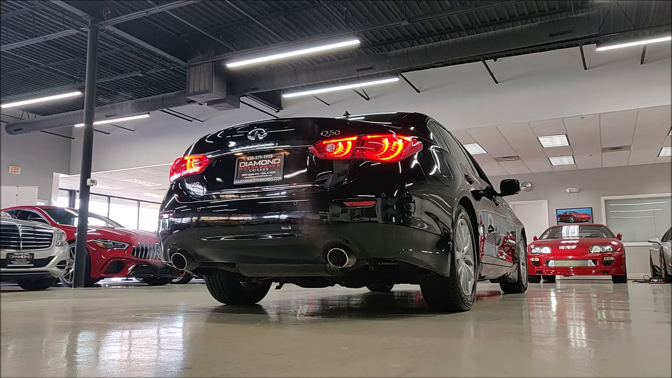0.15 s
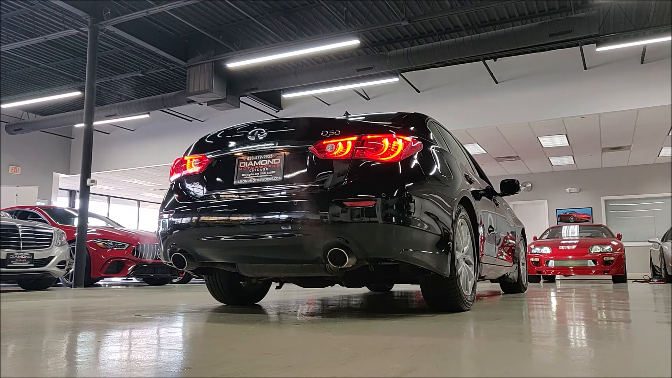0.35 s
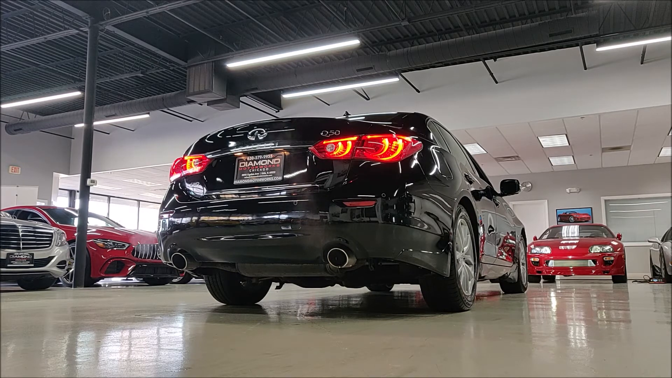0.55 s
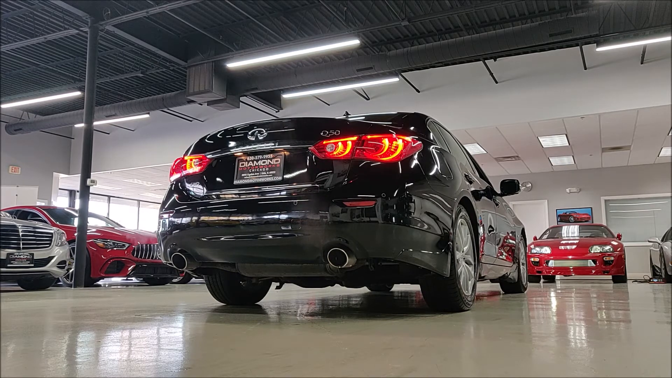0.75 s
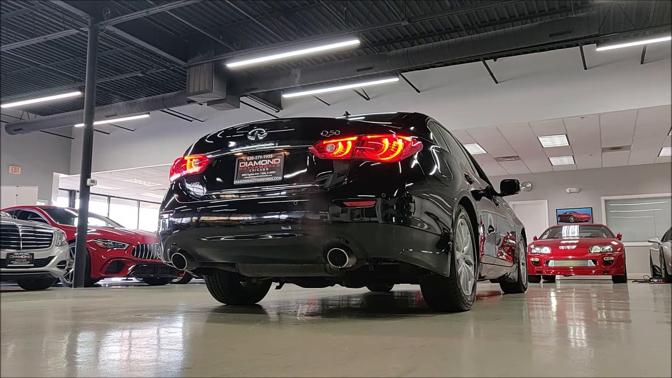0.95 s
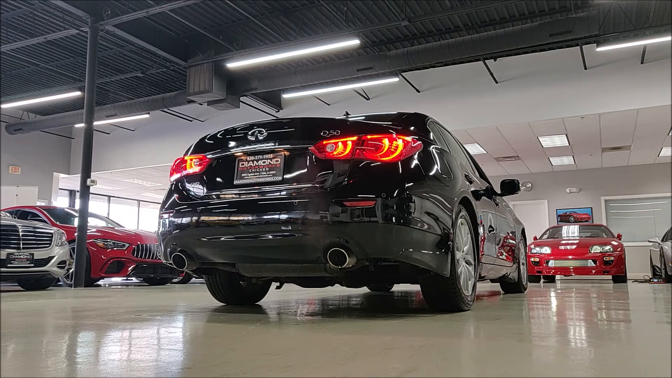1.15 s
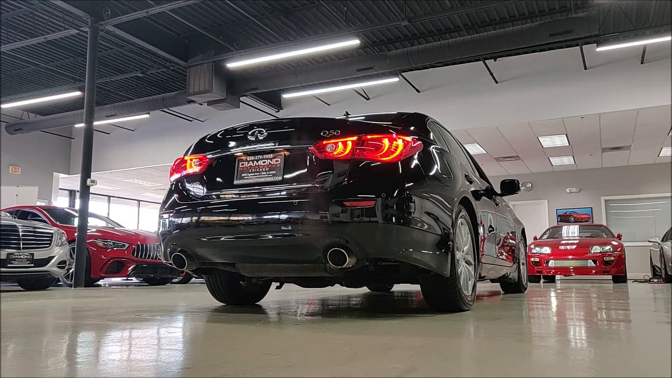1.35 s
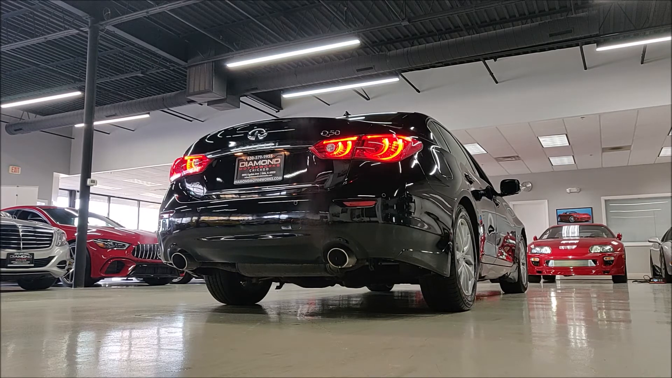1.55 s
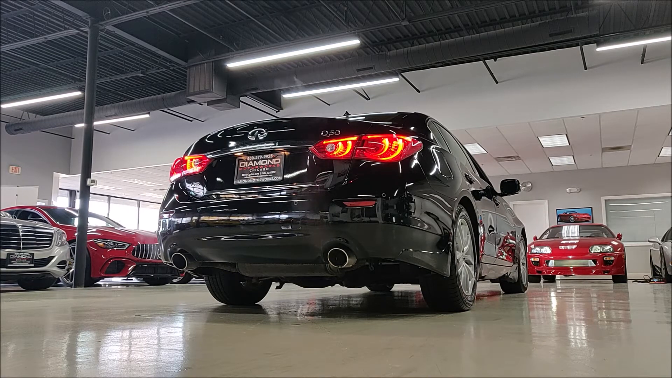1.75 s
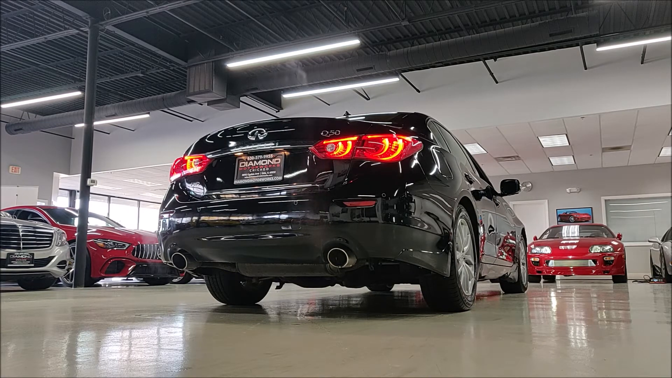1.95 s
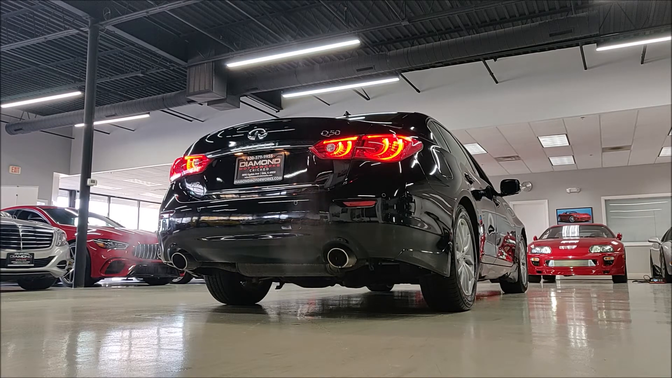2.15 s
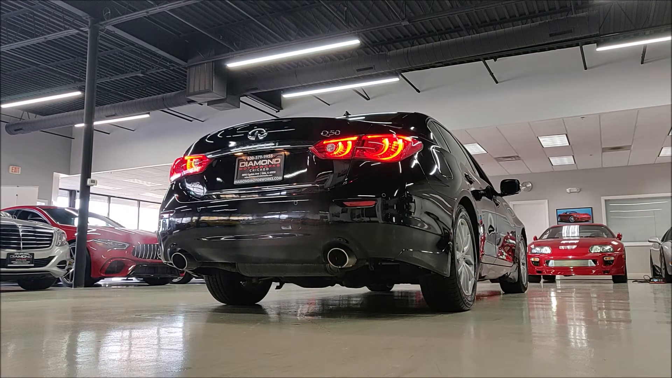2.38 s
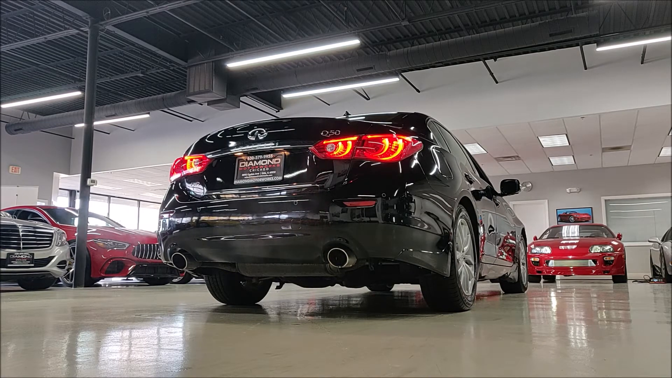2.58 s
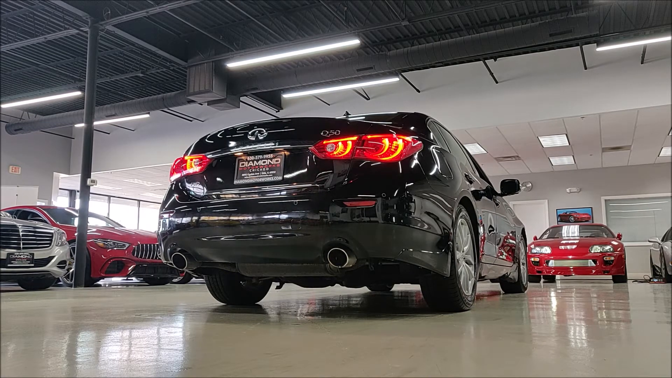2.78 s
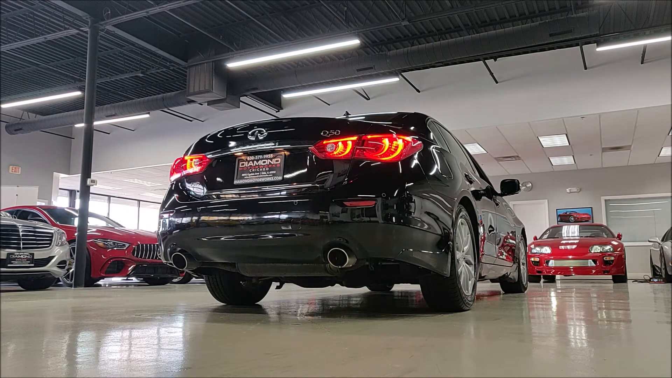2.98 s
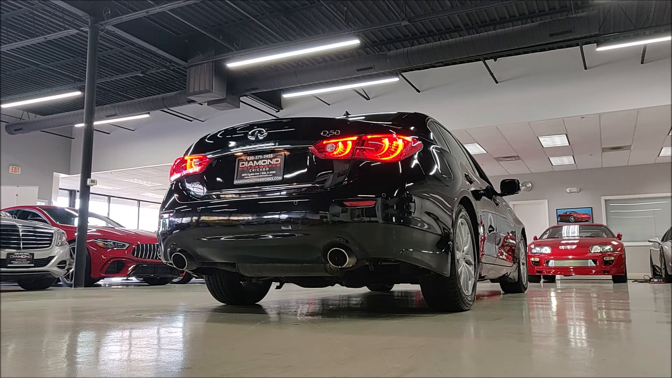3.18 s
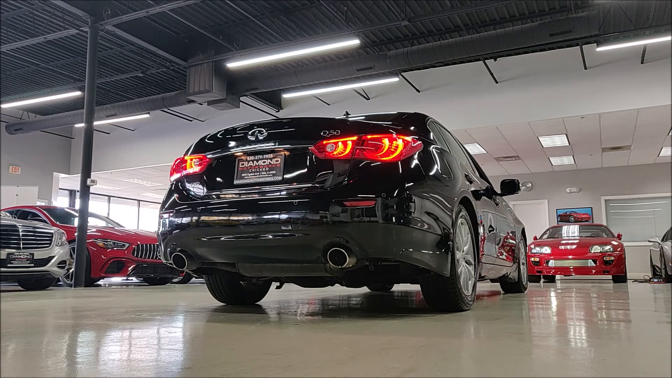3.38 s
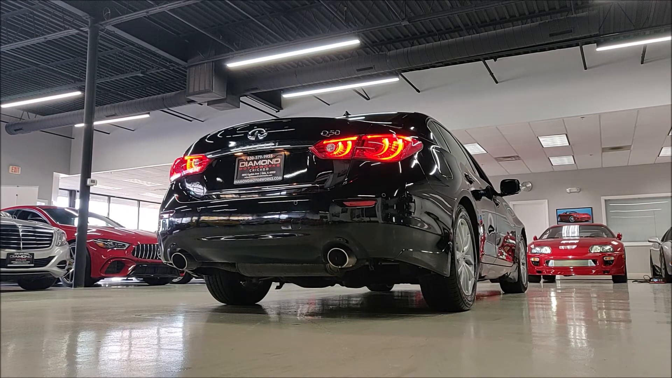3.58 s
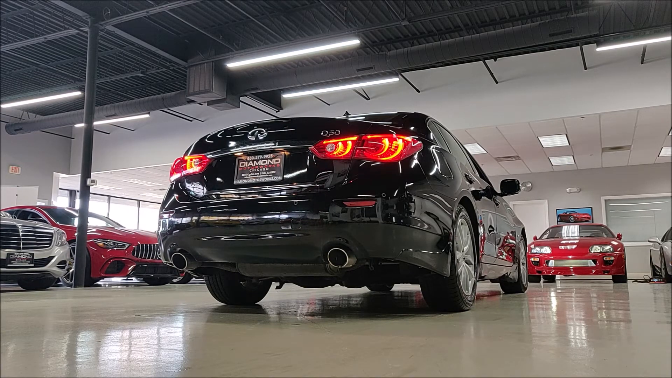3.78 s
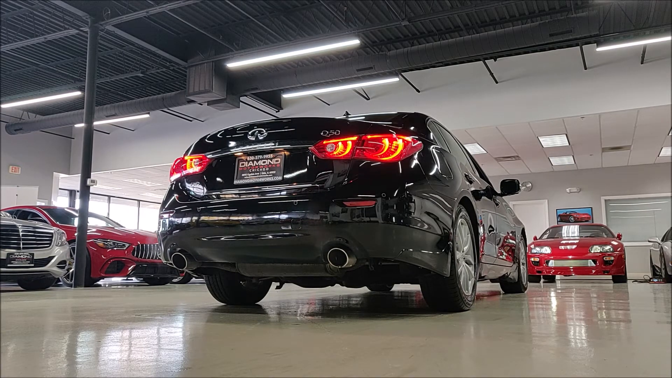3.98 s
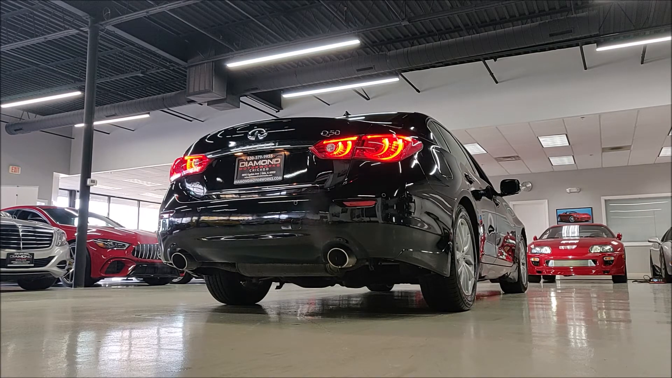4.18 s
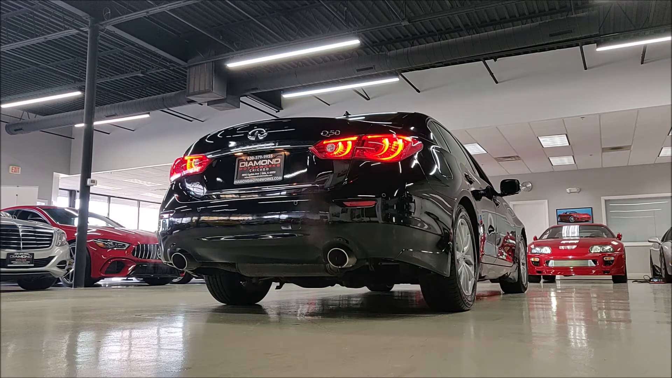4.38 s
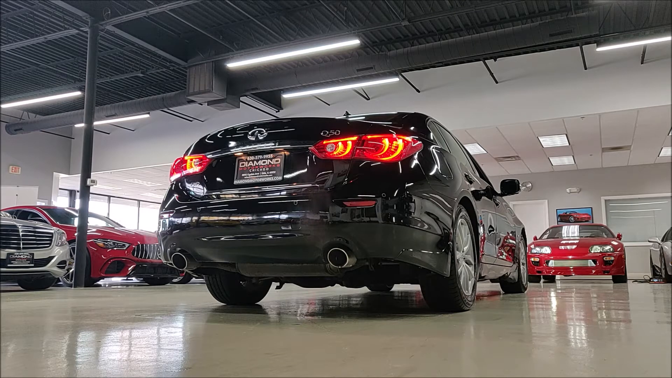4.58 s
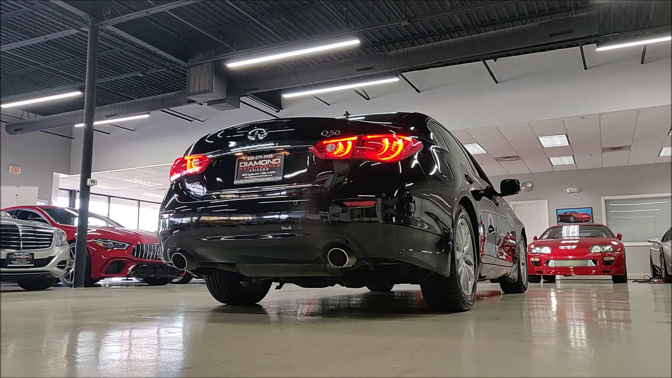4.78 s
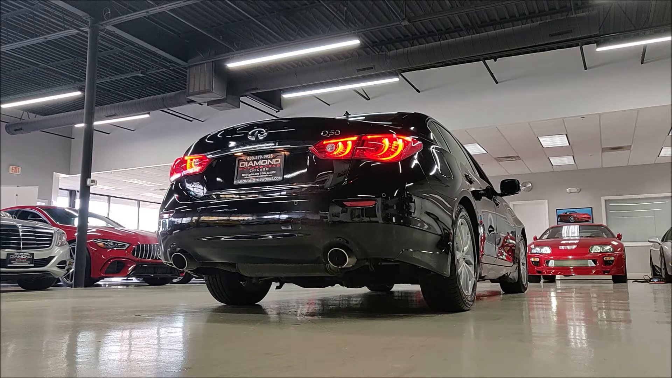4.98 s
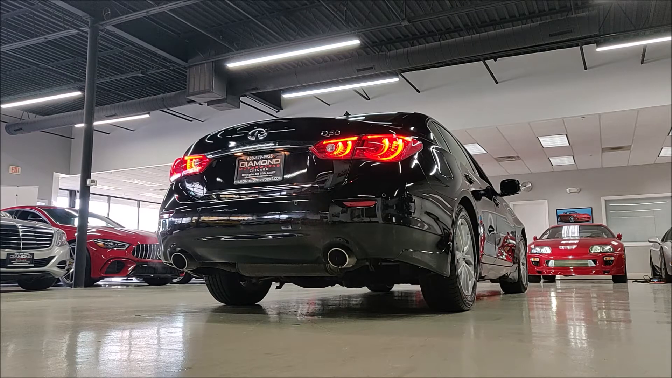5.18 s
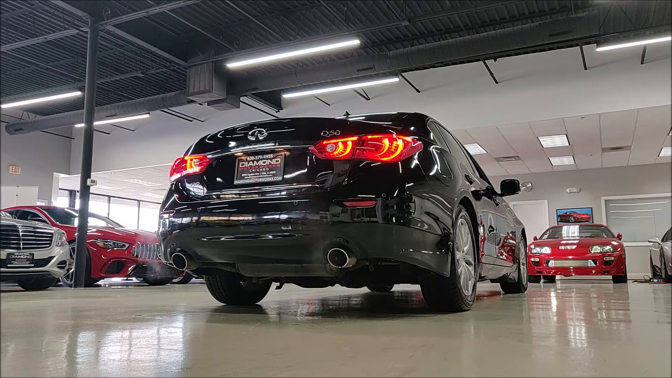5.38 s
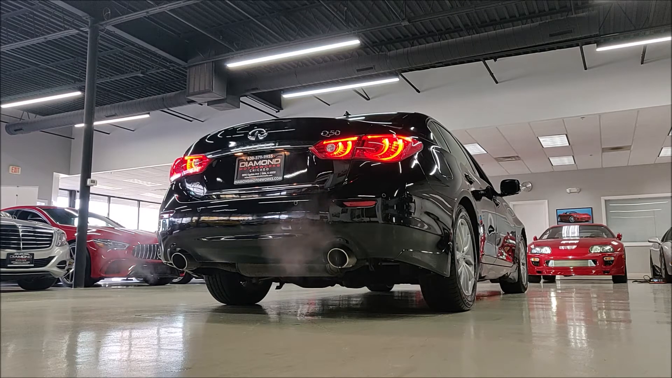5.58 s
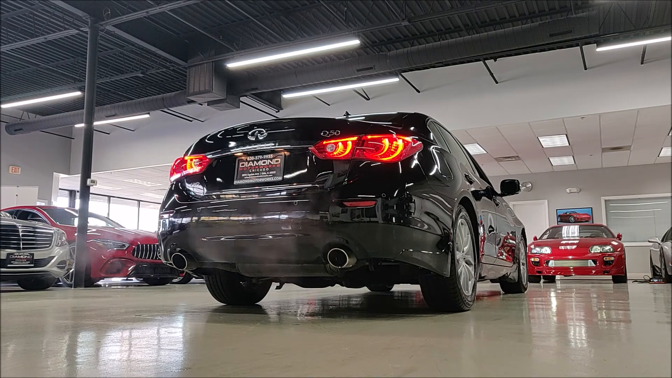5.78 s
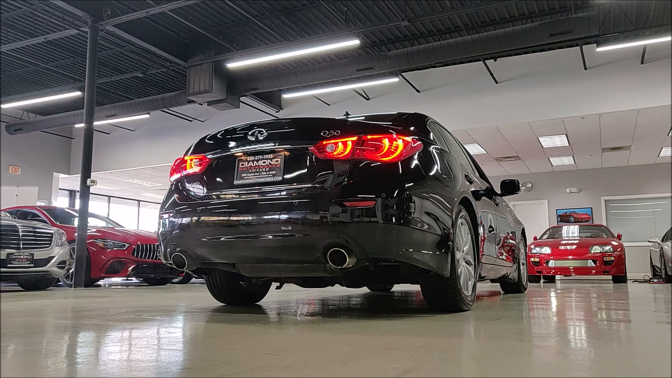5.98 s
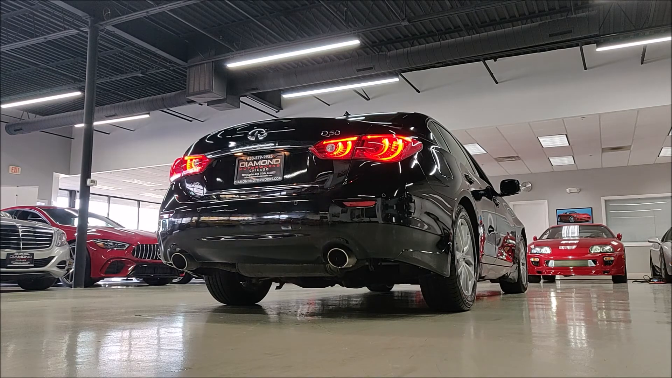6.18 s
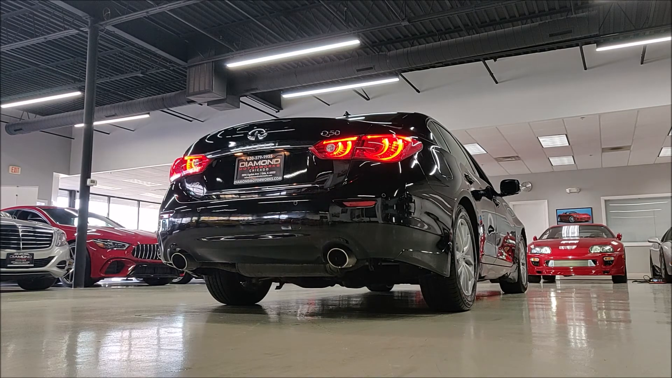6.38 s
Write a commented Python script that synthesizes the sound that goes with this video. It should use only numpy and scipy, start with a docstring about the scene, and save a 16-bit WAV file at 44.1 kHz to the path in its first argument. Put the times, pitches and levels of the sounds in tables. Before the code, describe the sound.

A car's exhaust purrs quietly at idle over steady low room noise in a large reflective hall. The throttle is stabbed: a full, hollow roar with airy hiss rises, then sinks through scattered pops to a slow idle. A stronger stab follows, climbing fast to a metallic howl, with a burst of sharp pops afterwards. Stereo microphones sit low behind the tailpipes; treble spreads wide in the echoes.

```python
"""A car idles on six cylinders in a large hard-floored hall, heard from low behind its tailpipes, then is revved twice.
Firing orders sound as clean tones; gas puffed out at each firing rings the fixed modes of pipes and silencer.
The jet hisses at the tips, belt-driven parts whine, the open intake whistles and late burns pop.
Dense echoes of the hall make the treble differ between the two microphones."""
import sys
import numpy as np
from scipy import signal
from scipy.fft import rfft, irfft, next_fast_len
from scipy.io import wavfile
from scipy.ndimage import uniform_filter1d

SR = 44100
rng = np.random.default_rng(int(sys.argv[2]) if len(sys.argv) > 2 else 0)


def store_pcm(level_fs):
    """Save levels as 16-bit WAV."""
    pcm = np.round(np.clip(level_fs, -1, 1) * 32767).astype(np.int16)
    wavfile.write(sys.argv[1], SR, np.atleast_2d(pcm).T)


N = 283989  # samples heard
LONG = N + 4096  # the engine runs on past the end
SIZE = next_fast_len(N + 2 * SR)
HZ = np.fft.rfftfreq(SIZE, 1 / SR)
TIME = np.arange(LONG) / SR  # s


def gain_of(db):
    """Level: 20 dB is a tenfold amplitude."""
    return 10 ** (np.asarray(db) / 20)


def evened(x):
    """Normalization: scales a signal to an rms of 1."""
    return x / np.sqrt(np.mean(x ** 2) + 1e-20)


def read(points, hz=HZ):
    """Spectral envelope: interpolates a table along log frequency."""
    f, value = np.transpose(points)
    return np.interp(np.log(hz + 1), np.log(f + 1), value)


def follow(curve, late_s=0):
    """Control curve: interpolates a table in time, optionally delayed."""
    s, value = np.transpose(curve)
    return np.interp(TIME - late_s, s, value)


def shape(x, response):
    """Linear filtering: multiplies the spectrum by a frequency response."""
    return irfft(rfft(x, SIZE) * response, SIZE)[..., :LONG]


def modes(table):
    """Modal superposition: sums damped resonances, with a steep skirt above the last one."""
    rings = 0
    for k, (f, width, db) in enumerate(table):
        resonance = 1j * HZ * width / (f * f - HZ ** 2 + 1j * HZ * width)
        # opposite signs of neighbours keep the valleys from cancelling
        rings = rings + (-1) ** k * gain_of(db) * resonance
    return rings / (1 + 1j * HZ / (1.41 * table[-1][0])) ** 2


def packed(response):
    """Porous absorption: the silencer packing soaks up the treble."""
    return response / (1 + 1j * HZ / 3000) ** 2


def lumps(seconds):
    """Random modulation: twice-smoothed noise of spread 1."""
    width = round(seconds * SR)
    return evened(uniform_filter1d(uniform_filter1d(rng.standard_normal(LONG), width), width))


def arch(s0, s1):
    """Amplitude envelope: swells and fades between two times."""
    return np.sin(np.pi * np.clip((TIME - s0) / (s1 - s0), 0, 1)) ** .5


def thin_tone(turns, s0, s1, db, unsteady):
    """Phase diffusion: a brief tone breaks up in level while its phase wanders at random."""
    wander = unsteady * np.cumsum(rng.standard_normal((2, LONG)), axis=1)
    return np.sqrt(2) * gain_of(db + 2.5 * lumps(.03)) * arch(s0, s1) * np.cos(2 * np.pi * turns + wander)


# colour of the steady noise of hall and engine bay: f/Hz, relative spectral level/dB
HALL_COLOUR = [(18, -46.5), (30, -23), (135, 6), (239, -14.5), (334, -11), (445, -11.5), (621, -13),
               (700, -14), (1160, -28), (3460, -26.5), (4610, -42.5), (6290, -63.5), (9000, -65),
               (11700, -83), (19800, -120)]


def hall_noise():
    """Stationary noise: white noise filtered to the colour of hall and engine bay."""
    noise = shape(rng.standard_normal((2, LONG)), gain_of(read(HALL_COLOUR)))
    return gain_of(-44.5) * evened(noise)


# firing rate of the engine: t/s, f/Hz
FIRING_RATE = [(0.0, 41.28), (0.14, 38.85), (0.9, 37.78), (1.85, 36.35), (1.91, 39.98), (2.15, 71.92),
               (2.3, 86), (2.37, 91.34), (2.45, 93.13), (2.55, 92.9), (2.63, 90.94), (2.75, 85.14),
               (3.0, 68.18), (3.25, 59.1), (3.55, 52.9), (4.0, 51.07), (4.22, 49.36), (4.4, 43.9),
               (4.73, 35.15), (5.25, 38.54), (5.36, 50.63), (5.45, 61), (5.59, 97.73), (5.73, 136.6),
               (5.79, 146.8), (5.87, 146.4), (5.95, 143.2), (6.03, 139.2), (6.2, 125.1), (6.44, 113.7)]


def firing_turns():
    """Phase as integrated frequency: counts the firings so far."""
    return np.cumsum(follow(FIRING_RATE)) / SR


def level_db(push, idle_db, octave_db, push_db, late_s=0):
    """Level law: rises or falls with octaves of speed and with a second control, which may act late."""
    octaves = np.log2(follow(FIRING_RATE) / 37)  # above a 37 Hz idle
    return idle_db + octave_db * octaves + push_db * follow(push, late_s)


# load on the engine: t/s, load (1 = full, below 0 = engine braking)
LOAD = [(0.0, 0.3), (0.4, -0.04), (1.88, 0.02), (1.96, 0.68), (2.02, 1.05), (2.15, 0.97), (2.26, 0.73),
        (2.42, 0.16), (2.7, 0.14), (2.95, 0.06), (3.4, -0.08), (4.15, -0.12), (4.29, 0.38), (4.5, 0.11),
        (5.25, 0.05), (5.33, 0.62), (5.45, 0.9), (5.58, 0.74), (5.7, 0.67), (5.82, 0.42), (5.95, -0.1),
        (6.12, 0.05), (6.3, 0.4), (6.44, 0.55)]
# firing tones: multiple of the firing rate, idle level/dB, change per octave of speed/dB, gain at full load/dB
FIRING_ORDERS = [(1.0, -48.5, 2.5, 20.5), (2.0, -54.5, 6, 18), (3.0, -52.5, 7.5, 13), (4.0, -53, -15, 26.5)]
# what pipes and hall do to a tone of each pitch: f/Hz, gain/dB
TONE_GAIN = [(36, -6.5), (45, -1.5), (56, 4.5), (66, -0.5), (74, -9), (82, -0.5), (91, 9.5), (100, 5),
             (112, 4), (125, 4.5), (140, -2), (150, 6), (165, 1.5), (180, -1.5), (195, 0), (213, -3),
             (240, -21), (280, -6), (315, -14), (335, 5.5), (352, 9.5), (370, -3.5), (392, -9),
             (420, -11.5), (520, -9.5), (575, 4), (620, -5)]
# modes of the long pipes: f/Hz, width/Hz, level/dB
LONG_PIPES = [(59.8, 1.6, 1.5), (84, 14.6, 2), (138.3, 15, -2), (157.1, 6.58, 9), (213.7, 29, 3.5)]


def firing_tones():
    """Harmonic series: each order of the firing rate is a tone, and passing orders excite the pipe modes."""
    hz, turns = follow(FIRING_RATE), firing_turns()
    # uneven burning makes each tone swell and sink, less so under load
    uneven_db = 2.5 * np.clip(1 - follow(LOAD), .3, 1)
    tones = 0
    for order, *law in FIRING_ORDERS:
        db = level_db(LOAD, *law) + read(TONE_GAIN, order * hz) + uneven_db * lumps(.06)
        lag_turns = .07 * order * order  # higher orders leave the pipes later
        tones = tones + np.sqrt(2) * gain_of(db) * np.cos(2 * np.pi * (order * turns - lag_turns))
    return tones + gain_of(-35) * shape(tones, modes(LONG_PIPES))


def gas_pulses():
    """Pulsed flow: every firing gives a sharp bang and a decaying puff, of a strength drawn at random."""
    turns = firing_turns()
    strength = gain_of(2.84 * rng.standard_normal((1000, 2)))[turns.astype(int)].T
    puffs = 0.5 + strength * np.exp(-(turns % 1) / 0.6)
    firing = np.diff(np.floor(turns), prepend=0)
    bangs = strength * firing * np.sqrt(SR / follow(FIRING_RATE))
    return puffs, bangs


# surge of gas beyond what the speed gives: t/s, surge (1 = full)
SURGE = [(0.0, 0.32), (0.4, 0.24), (1.88, 0.13), (1.97, 0.79), (2.06, 1.22), (2.18, 1.05), (2.32, 0.5),
         (2.5, -0.18), (2.75, 0.32), (2.95, 0.48), (3.2, 0.12), (4.15, 0.094), (4.75, 0.14), (5.27, 0.23),
         (5.4, 0.91), (5.5, 1.35), (5.62, 1.1), (5.72, 0.59), (5.85, 0.35), (6.05, 0.24), (6.14, 0.38),
         (6.25, 0.11), (6.44, 0.16)]
# gas in burble, long pipes, silencer, tailpipes, one row each:
# idle level/dB, change per octave of speed/dB, gain at full surge/dB, delay behind the surge/s
FLOW = [(-57.5, 1, 13.5, .005), (-53.5, 12, 11.5, 0.0063), (-54, 10, 11, 0.08), (-59, 13, 12.5, 0.023)]
# modes of burble, silencer, tailpipes, howl and upper tailpipes (rasp): f/Hz, width/Hz, level/dB
BURBLE = [(24, 14, -8), (43, 8, 0)]
SILENCER = [(273, 40, -1.5), (310.6, 20, 7.5), (352.8, 22.6, 9.5), (397.5, 42, 0.5)]
TAILPIPES = [(523, 133, -3), (565, 15, 7), (611.8, 9.3, 7.5), (819, 190, -7), (896, 76, -1.5),
             (910, 240, -20.5)]
HOWL = [(646, 16, 0), (680, 35, -6)]
RASP = [(786, 12, -4), (876, 14, 0), (1098, 22, -8), (1237, 16, 0), (1258, 16, 0), (1403, 12, -3),
        (1630, 40, -14), (1840, 90, -21)]
# control of the howl, then of the rasp: t/s, level/dB
HOWL_LEVEL = [(0.0, -54.5), (1.86, -56), (2.06, -32), (2.13, -31), (2.19, -24.5), (2.23, -39),
              (2.33, -40.5), (2.42, -46), (2.52, -44), (2.94, -42.5), (2.96, -28), (2.985, -32), (3.0, -50),
              (3.3, -57), (4.3, -53), (5.27, -60), (5.36, -43), (5.43, -35), (5.49, -20.5), (5.51, -39),
              (5.522, -14), (5.56, -16), (5.575, -12), (5.622, -8), (5.636, -19), (5.646, -12),
              (5.662, -19), (5.68, -7.5), (5.693, -20), (5.703, -5.5), (5.717, -21.5), (5.73, -15.5),
              (5.745, -31), (5.8, -21.5), (5.95, -34), (6.2, -40.5), (6.44, -29.5)]
RASP_LEVEL = [(0.0, -69), (1.9, -63), (2.06, -39), (2.12, -40.5), (2.25, -46.5), (2.4, -60.5), (2.92, -57),
              (2.96, -53), (3.02, -68), (5.3, -67), (5.45, -40.5), (5.55, -35), (5.62, -30.5),
              (5.68, -28.5), (5.75, -34), (5.8, -44), (6.44, -53)]


def gas_in_pipes(puffs, bangs):
    """Forced resonance: turbulent puffs and sharp bangs ring the fixed modes of pipes and silencer."""
    burble_db, long_db, silencer_db, tail_db = [level_db(SURGE, *law) for law in FLOW]
    for s0, s1, lumpy_db, *_ in OVERRUN:
        burble_db = burble_db + lumpy_db * arch(s0, s1)
    # level/dB, sharp bang against soft puff, modes
    pipes = [(burble_db, 0, BURBLE), (long_db, .8, LONG_PIPES), (silencer_db, .9, SILENCER),
             (tail_db, .8, TAILPIPES), (follow(HOWL_LEVEL) - 13.5, .5, HOWL),
             (follow(RASP_LEVEL), .4, RASP)]
    under_load = 1 + .7 * np.clip(follow(LOAD), 0, 1)  # full cylinders bang harder
    gas = 0
    for db, crisp, table in pipes:
        drive = puffs * rng.standard_normal((2, LONG)) + crisp * bangs * under_load
        response = packed(modes(table))
        gas = gas + shape(drive * gain_of(db), response) / shape(drive[0], response).std()
    return gas


def singing(hz, db):
    """Self-sustained oscillation: flow keeps a pipe mode sounding, wavering in pitch and strength."""
    wander = .025 * uniform_filter1d(np.cumsum(rng.standard_normal((2, LONG)), axis=1), 60)
    return np.sqrt(2) * gain_of(db + 1.5 * lumps(.012)) * np.cos(2 * np.pi * hz * TIME + wander)


# control of the lower tailpipe mode as it sings: t/s, level/dB
RING_LEVEL = [(0.0, -63), (0.66, -84), (1.92, -58), (2.08, -50), (2.37, -22.5), (2.44, -35), (2.49, -51),
              (2.64, -37.5), (2.92, -54), (2.96, -36), (3.05, -69), (3.08, -43), (3.16, -63), (5.27, -66.5),
              (5.54, -43.5), (5.67, -38.5), (5.78, -16.5), (5.92, -43), (5.95, -21.5), (6.28, -41.5),
              (6.4, -28.5), (6.44, -41)]


def singing_pipes():
    """Modal tones: the lowest howl mode and the lower tailpipe mode sing at fixed pitch."""
    howl = singing(639, follow(HOWL_LEVEL) - 2.5)
    return howl + singing(568, follow(RING_LEVEL) - 5)


# colour of the hiss at the tips: f/Hz, relative spectral level/dB
TIP_COLOUR = [(590, -4.5), (1000, 0.5), (1360, -2), (2130, -9), (3330, -6), (4240, -14), (6410, -15),
              (9150, -43.5), (11900, -42.5), (13500, -35), (15500, -40)]
# control of the jet: t/s, level/dB
JET_LEVEL = [(0.0, -64), (0.11, -65.5), (1.86, -67.5), (1.97, -59.5), (2.04, -51), (2.15, -48.5),
             (2.19, -52.5), (2.39, -53.5), (2.85, -54), (3.35, -60.5), (4.16, -63), (5.06, -70),
             (5.33, -63), (5.58, -44), (5.59, -48), (5.61, -44), (5.7, -42), (5.76, -45.5), (6.35, -48.5),
             (6.44, -51)]


def jet_hiss(puffs):
    """Jet noise: flow at the tips, steadier than the gas inside, hisses and sizzles far up the treble."""
    jet = rng.standard_normal((2, LONG)) * (4 + puffs)
    jet_db = follow(JET_LEVEL)
    hiss = gain_of(jet_db + 9) * evened(shape(jet, gain_of(read(TIP_COLOUR))))
    sizzle = evened(shape(jet, modes([(11287, 5000, 0)])))  # one broad resonance
    return hiss + gain_of(0.59 * jet_db - 42) * sizzle


# intake whistles while the throttle is open: start t/s, end t/s, f/Hz, level/dB
WHISTLES = [(2.04, 2.19, 5020, -62), (5.47, 5.62, 5080, -54)]


def intake_whistles():
    """Flow tones: the whistles of the intake hold their pitch whatever the engine speed."""
    return sum(thin_tone(hz * TIME, s0, s1, db, 0.08) for s0, s1, hz, db in WHISTLES)


# whines of belt-driven parts: multiple of the firing rate, start t/s, end t/s, level/dB
WHINES = [(37.4, 2.28, 2.85, -55.5), (55.8, 2.98, 3.32, -62.5), (8.55, 3.55, 4.4, -52)]


def belt_whines():
    """Fixed drive ratio: whines follow the engine speed at set multiples of the firing rate."""
    turns = firing_turns()
    return sum(thin_tone(multiple * turns, s0, s1, db, 0.00048 * multiple)
               for multiple, s0, s1, db in WHINES)


# lumpy running on a shut throttle: start t/s, end t/s, gain of the burble/dB,
# level/dB of the tone at 0.5 times the firing rate, level/dB of the tone at 1.5 times
OVERRUN = [(2.49, 3.167, 14, -38.5, -42.5), (5.876, 6.143, 8, -38.5, -28)]


def uneven_banks():
    """Subharmonics: banks that fire unevenly sound at half-orders of the firing rate."""
    turns = firing_turns()
    tones = 0
    for s0, s1, _, *levels in OVERRUN:
        for order, db in zip((.5, 1.5), levels):
            tones = tones + thin_tone(order * turns, s0, s1, db, .002)[0]
    return tones


# late burns on a shut throttle: t/s, bang level/dB, low thump level/dB (before the gains below)
POPS = [(2.651, -37, -16), (2.746, -35, -29), (2.787, -46, -31), (2.947, -21, -14), (2.968, -25.5, -26),
        (3.013, -45, -39), (3.077, -32.5, -47), (5.839, -18, -45), (5.886, -21.5, -45), (5.956, -21, -46),
        (5.997, -24, -45), (6.02, -27.5, -40), (6.047, -18, -26), (6.086, -22.5, -48)]


def pops():
    """Impulse response: each late burn is a few ms of bang that rings the tailpipes and thumps the long pipes."""
    t = np.arange(800) / SR
    bang, thump = np.zeros((2, 2, LONG))
    for s, db, low_db in POPS:
        at = round(s * SR)
        noise = 0.46 * rng.standard_normal((2, len(t))) * np.exp(-t / 0.0048)
        click = 2.95 * np.exp(-t / 0.00017)
        bang[:, at:at + len(t)] += gain_of(db) * (noise + click)
        thump[:, at:at + len(t)] += gain_of(low_db) * np.exp(-t / 0.0016)
    ring = modes(HOWL) + gain_of(-20) * modes(RASP)
    ring = ring + gain_of(-11) * modes(TAILPIPES) - gain_of(-14) * modes(SILENCER)
    return gain_of(27.5) * shape(bang, packed(ring)) + gain_of(1.5) * shape(thump, modes(LONG_PIPES))


def exhaust():
    """Superposition: tones and gas add up; row 0 is what both microphones share, row 1 how they differ."""
    puffs, bangs = gas_pulses()
    tones = (firing_tones() + uneven_banks()) * gain_of([[0], [-1.5]])
    return tones + singing_pipes() + gas_in_pipes(puffs, bangs) + jet_hiss(puffs)


# difference of the microphones against their sum: f/Hz, level/dB
DIFFERENCE = [(60, -26), (125, -19), (250, -14.5), (680, -14.5), (1250, -5), (2400, -1), (8000, .4)]
# left microphone over right: f/Hz, level/dB
LEFT_OVER_RIGHT = [(60, 0.5), (92, 0.5), (140, 1.0), (210, 0.5), (330, 0.5), (500, 0.5), (770, 1.0),
                   (1170, 0.0), (1790, -1.5), (2740, -5.0), (4190, -4.0), (6410, 0.5), (9810, -1.0),
                   (15000, -0.5)]


def hall(x):
    """Reverberation: bass reaches both microphones alike; dense echoes colour the treble and make it differ."""
    t = np.arange(SR // 2) / SR
    echoes = rng.standard_normal((2, len(t))) * gain_of(-60 * t)  # falls 60 dB per second
    echoes /= np.linalg.norm(echoes, axis=1, keepdims=True)
    wet = .16 * HZ / (HZ + 500)  # share of power in the echoes
    x = shape(x, np.sqrt(1 - wet) + np.sqrt(wet) * rfft(echoes, SIZE))
    # the difference is turned a quarter cycle
    shared, unlike = shape(x, np.array([HZ ** 0, 1j * gain_of(read(DIFFERENCE))]))
    balance = gain_of(read(LEFT_OVER_RIGHT) * np.array([[.5], [-.5]]))
    return shape(np.array([shared + unlike, shared - unlike]), balance)


def scene():
    """Superposition: all sources add up and pass through the hall."""
    sources = hall_noise() + exhaust() + intake_whistles() + belt_whines() + pops()
    return hall(sources)[:, :N]


def record(dry):
    """Band limiting: the hiss of the microphones is added, then a low-pass removes the top treble."""
    hissy = dry + gain_of(-70) * rng.standard_normal(dry.shape)
    low_pass = signal.firwin(1023, 15660, window=("kaiser", 9), fs=SR)  # cutoff in Hz
    padded = np.pad(hissy, ((0, 0), (511, 511)), "reflect", reflect_type="odd")
    return signal.oaconvolve(padded, low_pass[None], "valid", axes=1)


dry = scene()
out = record(dry)
store_pcm(out)
```